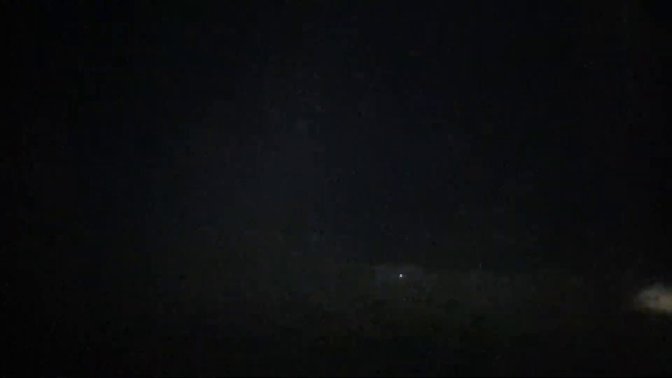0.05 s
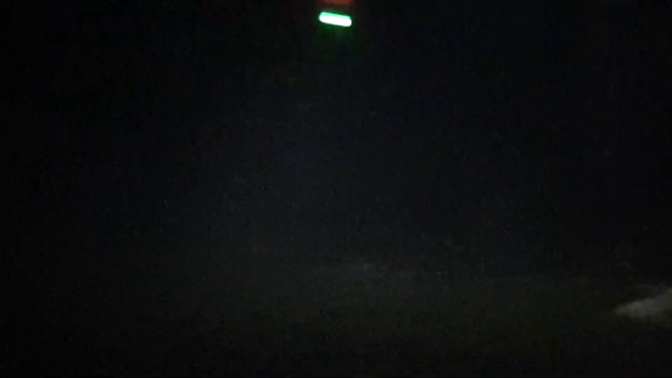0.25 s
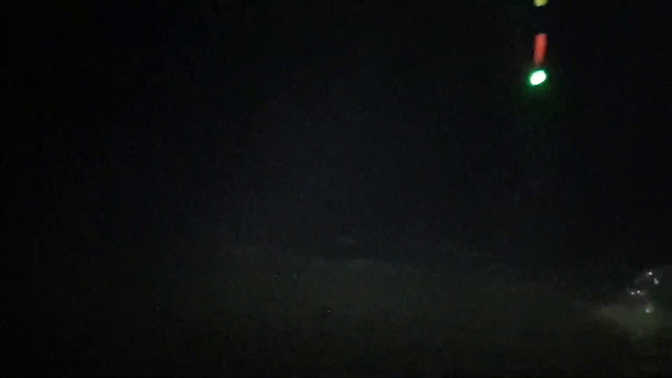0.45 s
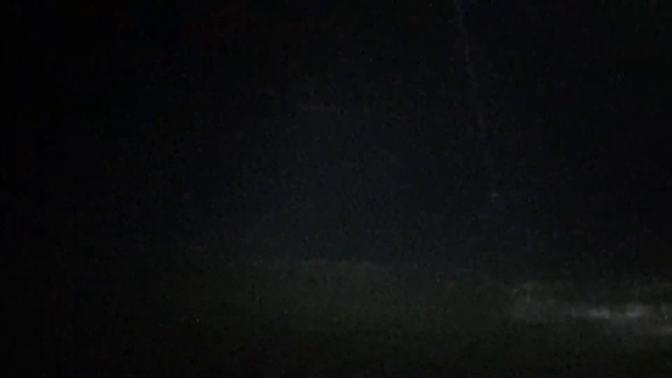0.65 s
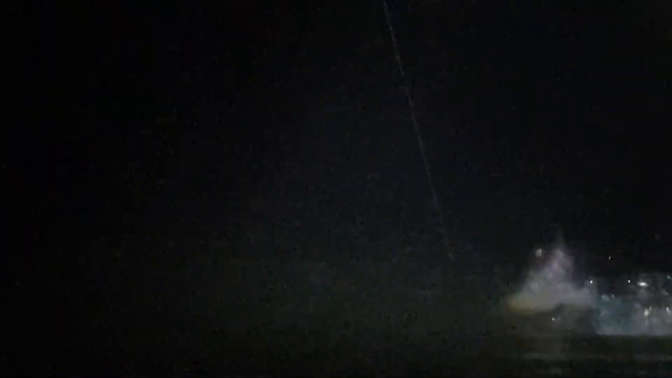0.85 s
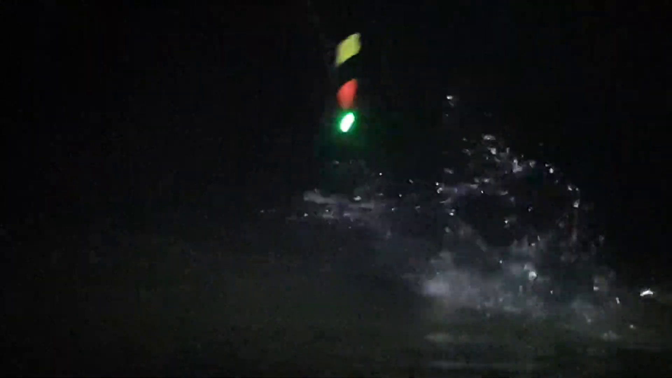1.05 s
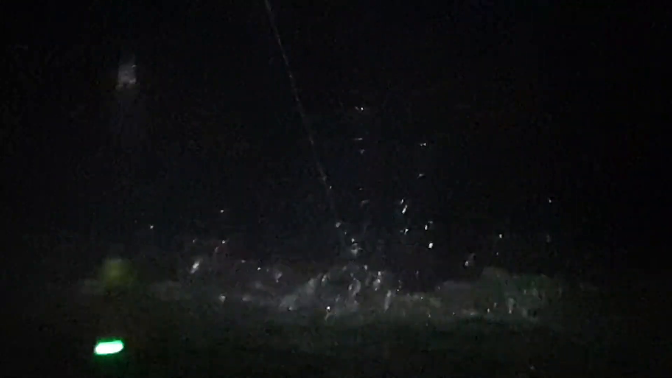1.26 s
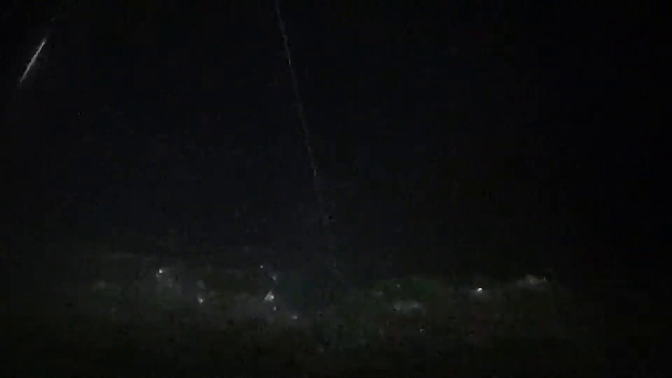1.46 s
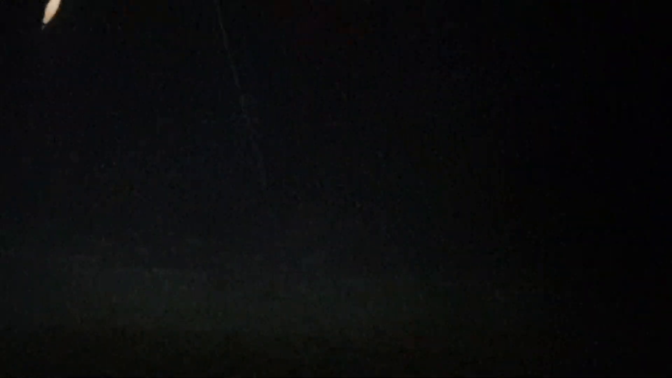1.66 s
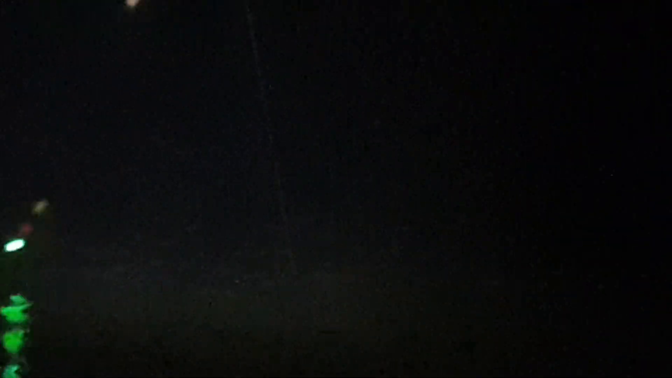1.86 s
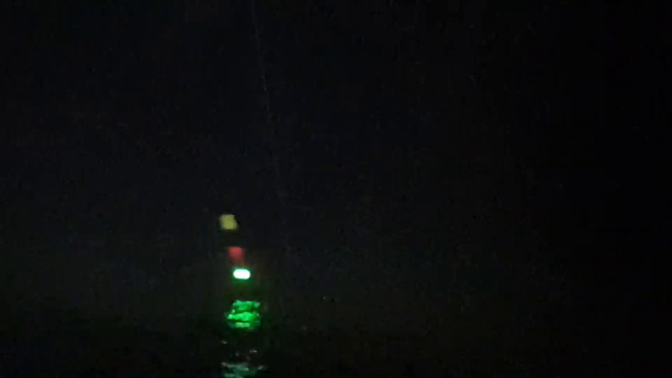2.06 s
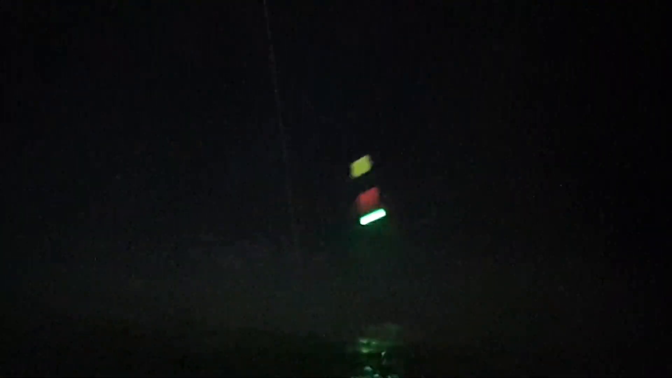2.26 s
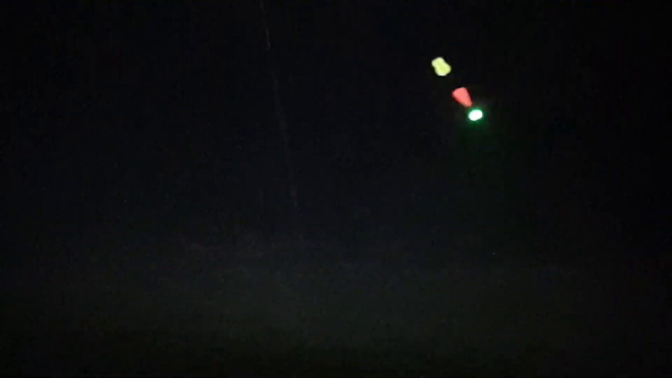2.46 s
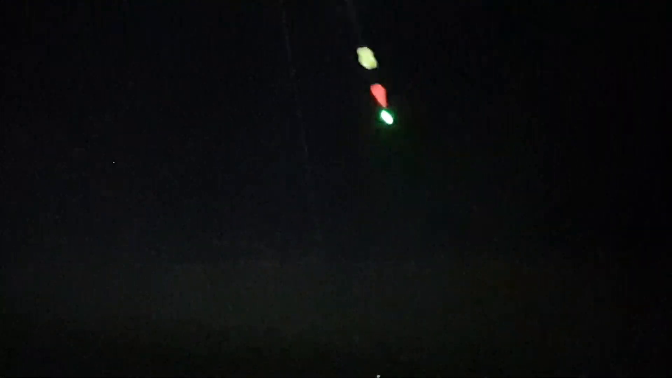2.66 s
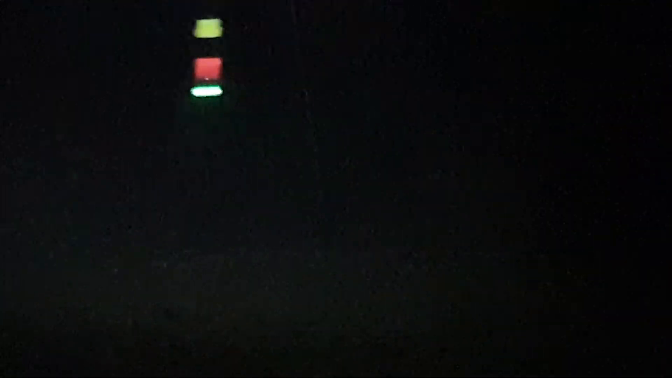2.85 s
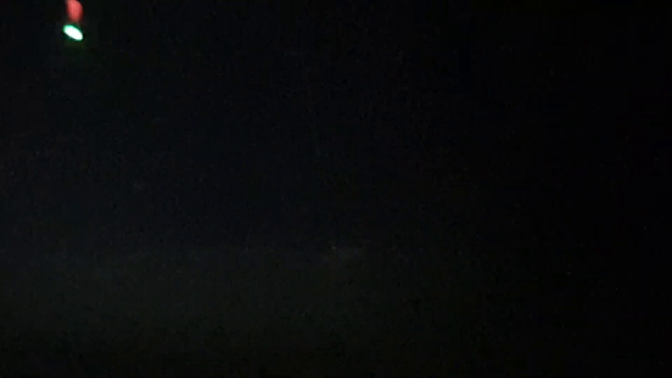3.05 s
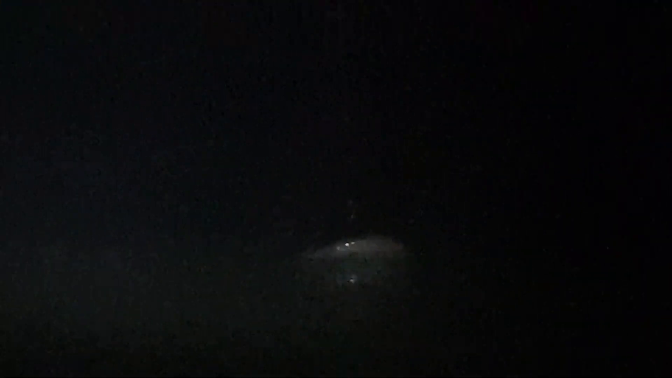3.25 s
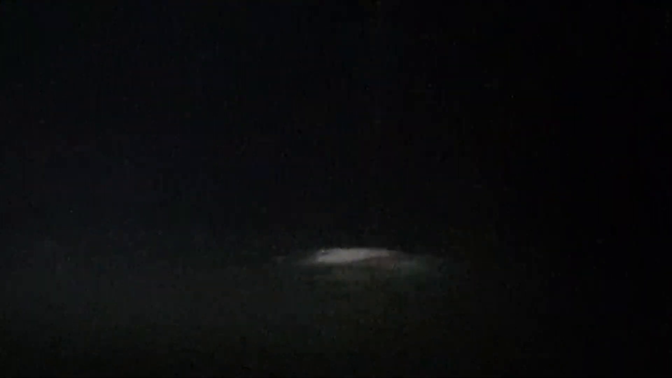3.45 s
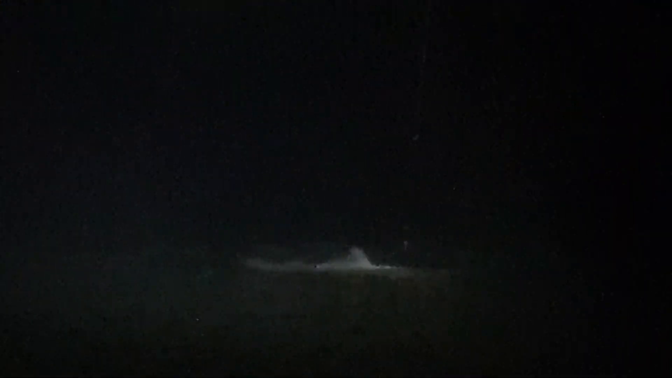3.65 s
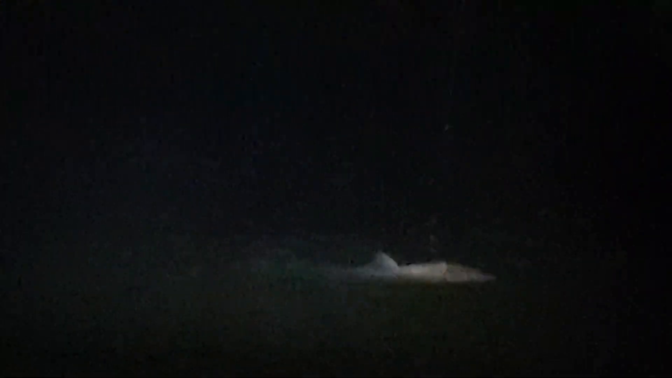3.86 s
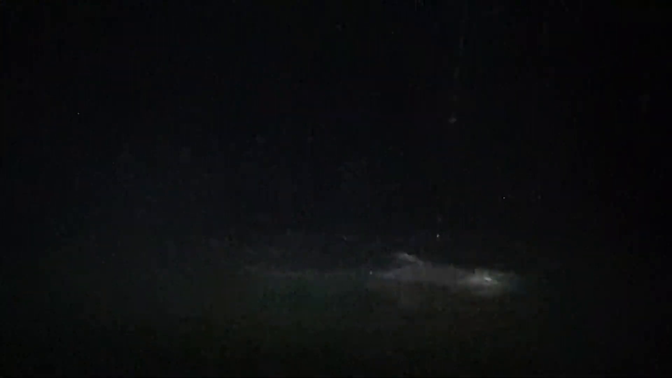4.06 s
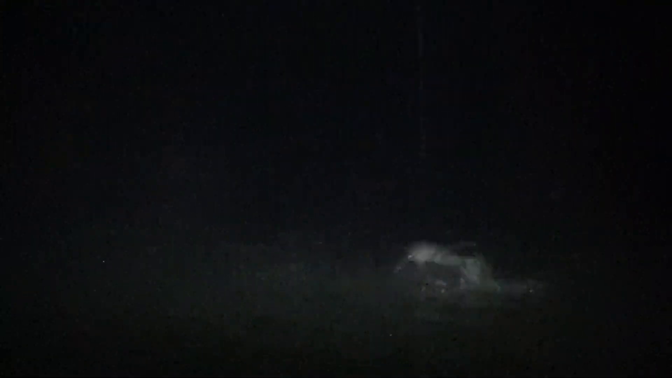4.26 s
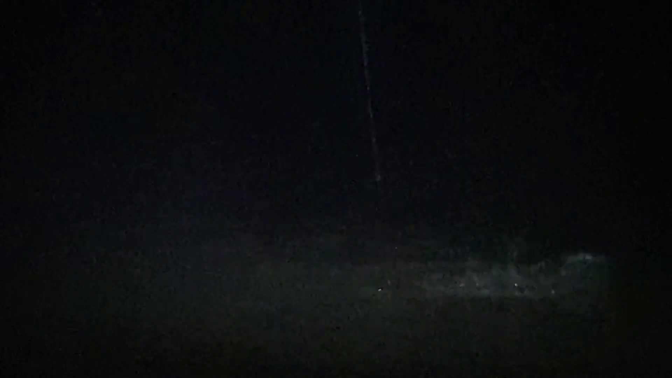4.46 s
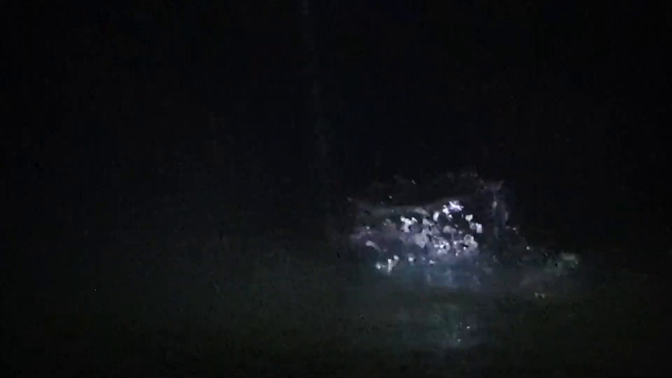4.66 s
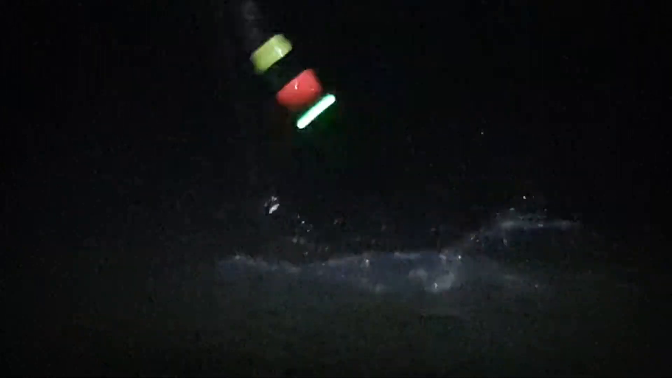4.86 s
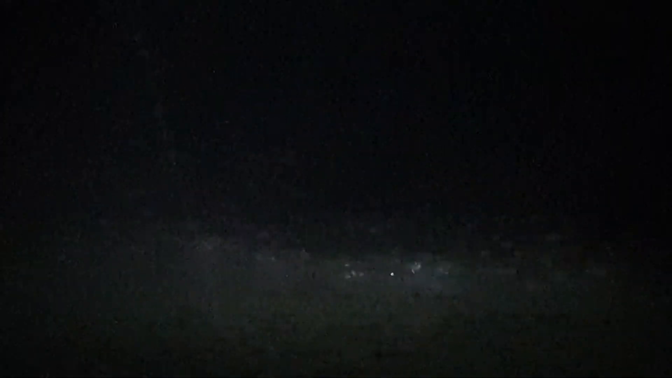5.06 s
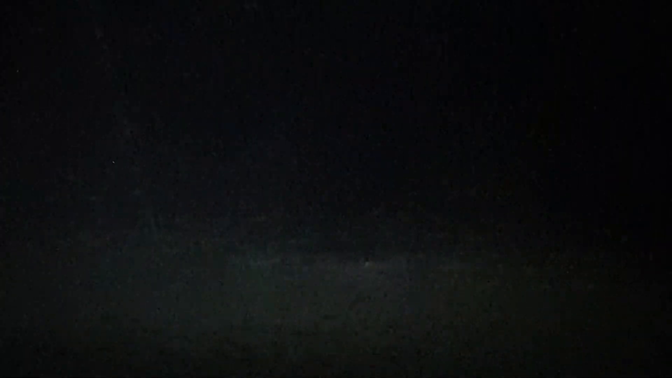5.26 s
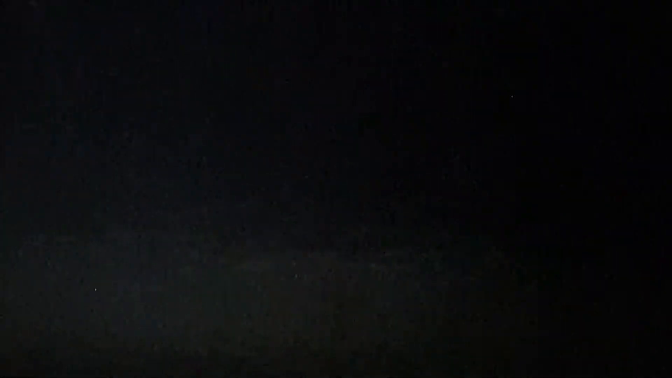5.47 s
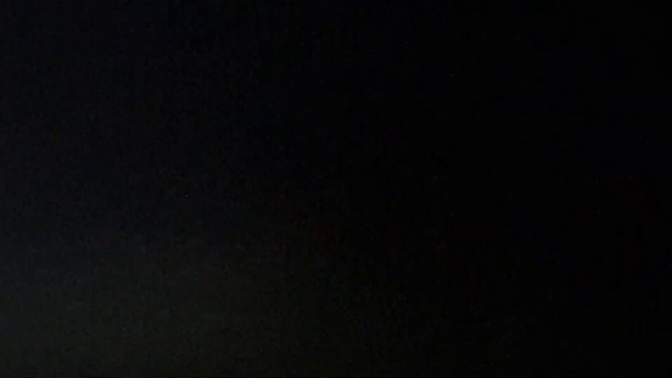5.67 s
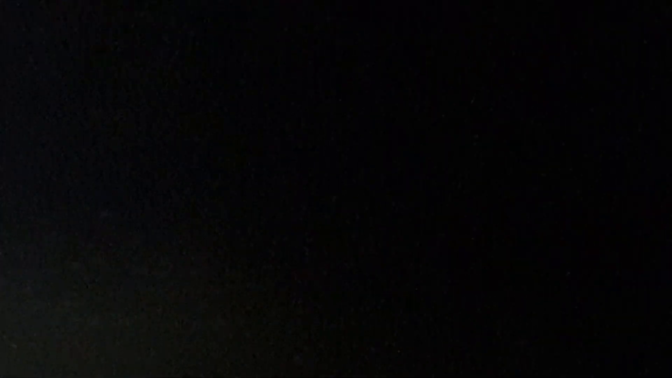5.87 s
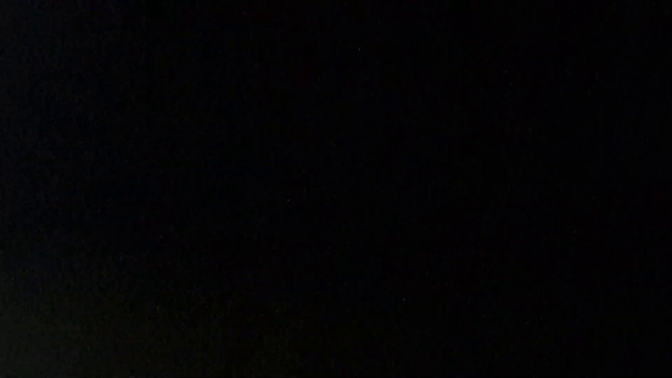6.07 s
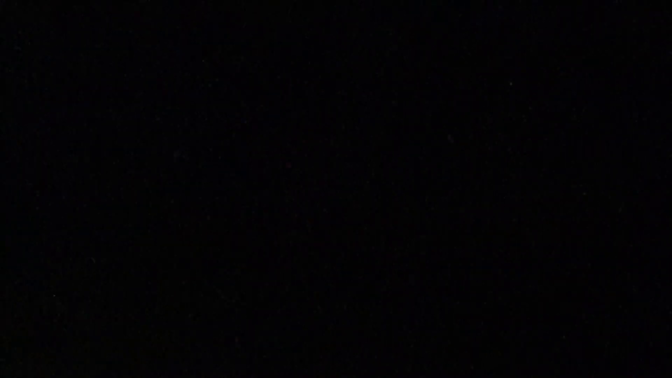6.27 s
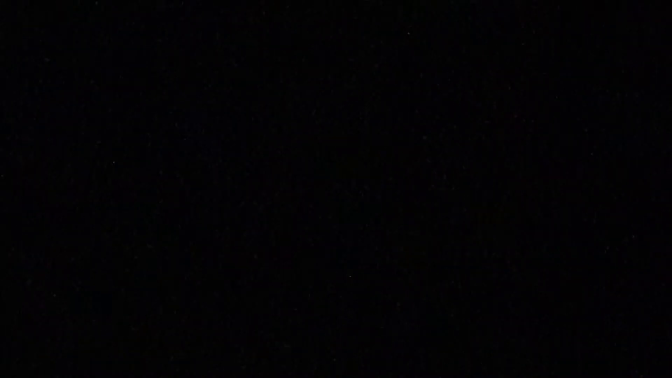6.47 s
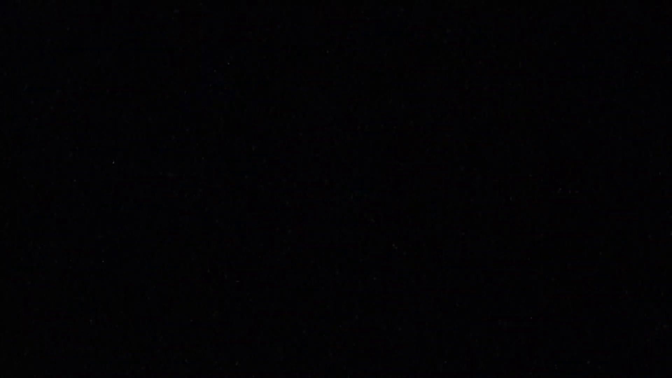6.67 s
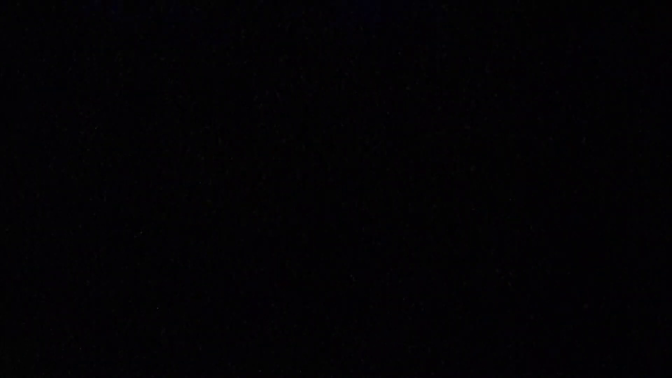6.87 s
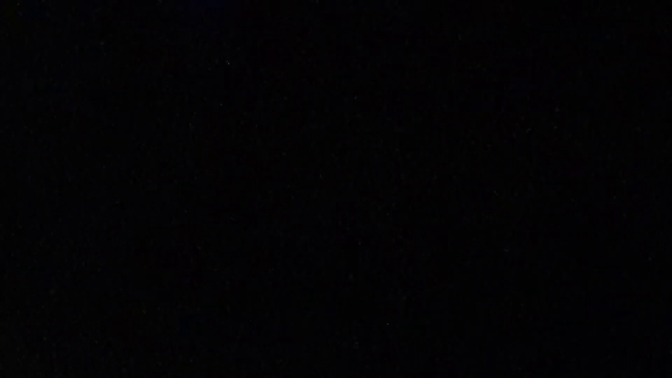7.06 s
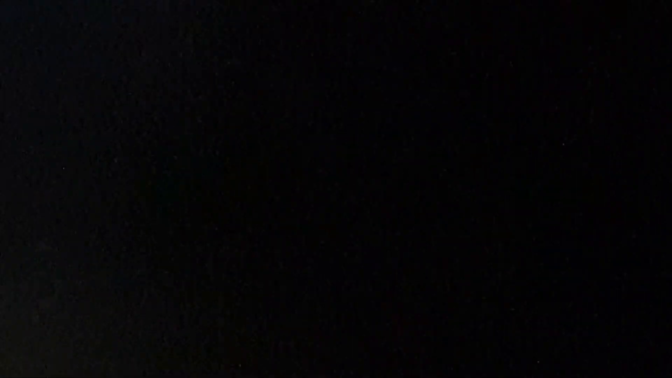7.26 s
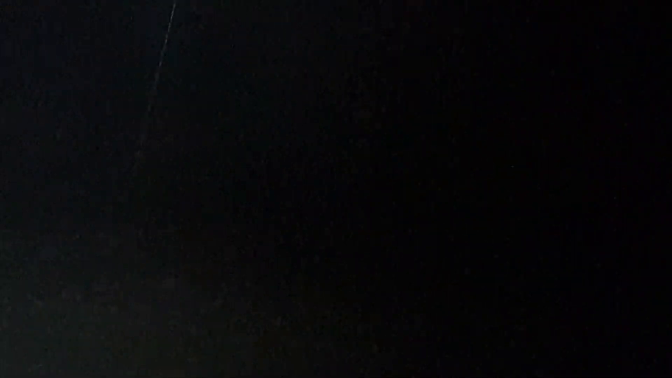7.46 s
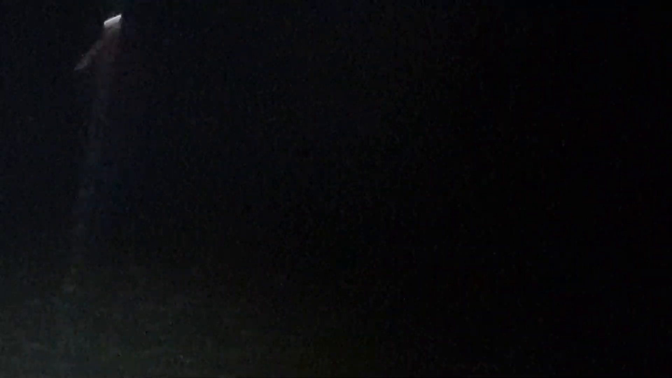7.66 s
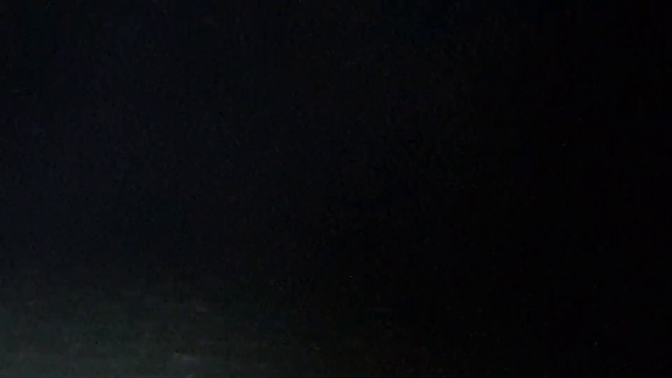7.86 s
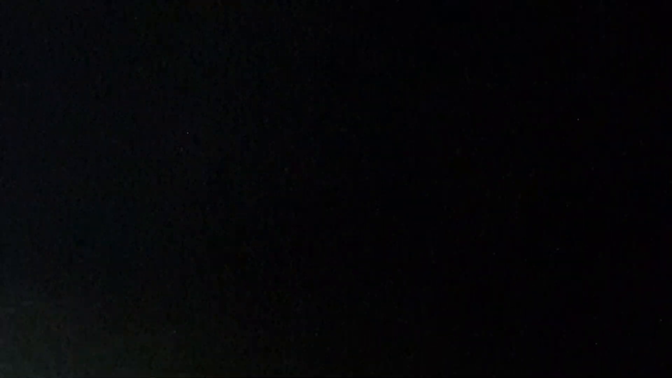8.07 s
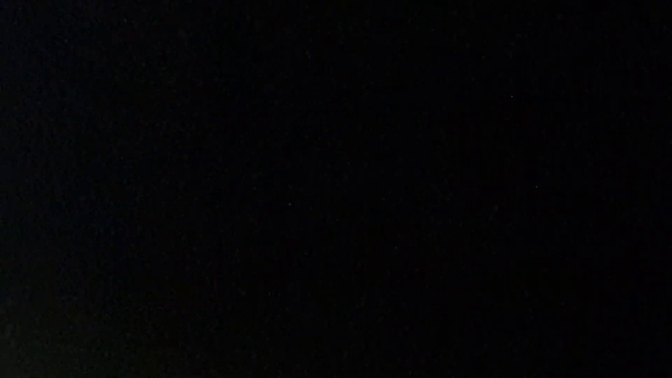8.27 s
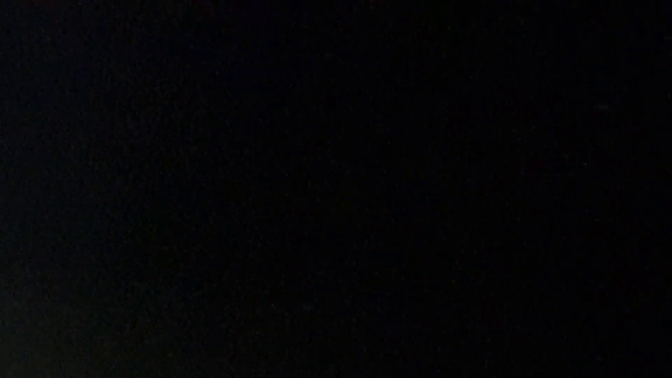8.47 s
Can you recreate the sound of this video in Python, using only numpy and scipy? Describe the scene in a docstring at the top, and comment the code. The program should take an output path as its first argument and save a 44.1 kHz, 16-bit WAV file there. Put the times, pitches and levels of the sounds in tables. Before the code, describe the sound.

A hooked fish thrashes at the surface of a still night pond in two splashing bouts, then clothing rustles and bumps close by.

```python
"""A far rumble, a wavering low hum (filtered noise and a sine) and a faint hiss lie under the whole night scene.
From the start a hooked fish thrashes at the surface of a pond in two bouts with a quiet spell between:
air pockets ring with gliding notes, churned water bubbles in damped sines, spray and drops patter in short bursts.
Then the angler shifts close to the microphone: jacket fabric swishes in bands of noise, with scuffs of noise
and soft bumps of damped low tones."""
import sys
import numpy as np
from scipy import signal
from scipy.io import wavfile

SR = 44100
rng = np.random.default_rng(int(sys.argv[2]) if len(sys.argv) > 2 else 0)


def persist_wave(psi):
    """Save psi, clipped to +-1, as 16-bit WAV."""
    counts = np.round(np.clip(psi, -1, 1) * 32767).astype(np.int16)
    wavfile.write(sys.argv[1], SR, np.atleast_2d(counts).T)


N = 375732
TIME = np.arange(N) / SR
STEPS = TIME[::32]  # coarse time for envelopes
CUTOFF_HZ = 15900

# relative spectrum of moving water as the microphone hears it: frequency_hz, density_db
WATER_COLOUR = [(150, 1), (300, -5), (500, 4.5), (1000, 4.5), (1600, 1.5), (3000, -4.5), (5000, -1),
                (7200, -1.5), (8800, -12), (10500, -6.5), (15500, -13.5)]


def from_db(db):
    """Level in decibels is twenty times the logarithm of an amplitude ratio; this inverts it."""
    return 10 ** (np.asarray(db) / 20)


def rms_one(x):
    """Root-mean-square normalisation gives signals equal mean power."""
    return x / np.sqrt(np.mean(x ** 2) + 1e-20)


def at_hz(points, hz):
    """Interpolation on a log-frequency axis treats every octave alike."""
    table = np.array(points)
    return np.interp(np.log(hz), np.log(table[:, 0]), table[:, 1])


def swell(s, hold_s, db, rise_db_per_s, fall_db_per_s):
    """Exponential growth and decay: the level climbs in dB to time s, holds, then falls."""
    before_s = np.maximum(s - STEPS, 0)
    after_s = np.maximum(STEPS - s - hold_s, 0)
    return from_db(db - rise_db_per_s * before_s - fall_db_per_s * after_s)


def joint_level(envelopes):
    """Incoherent sources add in power: joint level in dB at every sample."""
    power = np.sum(np.square(envelopes), axis=0)
    return np.interp(TIME, STEPS, 10 * np.log10(power + 1e-12))


def drift(rate, size=N):
    """Random modulation: Gaussian values of zero mean, `rate` a second, joined by straight lines."""
    return np.interp(np.arange(size) * rate / SR, np.arange(4000), rng.standard_normal(4000))


def band(x, low_hz, high_hz, order=2):
    """A Butterworth band-pass has a maximally flat passband."""
    edges = [low_hz, min(high_hz, .48 * SR)]
    return signal.sosfilt(signal.butter(order, edges, "band", fs=SR, output="sos"), x)


def add(out, s, sound, pan_db=0, lag=0):
    """Level and time differences place a sound: positive pan favours left, which hears it `lag` samples late."""
    for side, gain, delay in zip(out, from_db([pan_db / 2, -pan_db / 2]), (int(lag), 0)):
        start = min(max(int(s * SR) + delay, 0), N)
        side[start:start + len(sound)] += gain * sound[:N - start]


def banded_noise(colour, patchy_db, flicker_rate, count=20):
    """Partly correlated stereo noise: bands mix a common and an opposed part and flicker singly; rms 1."""
    # correlation of left and right: frequency_hz, likeness
    likeness = [(30, 0.296), (150, 0.87), (1000, 0.26), (4000, 0.072)]
    edges = np.geomspace(max(colour[0][0], 22), CUTOFF_HZ, count + 1)
    out = 0
    white = rng.standard_normal((2, 2, N))
    for k, (low, high) in enumerate(zip(edges, edges[1:])):
        mid, side = band(white[k % 2], low, high, order=3)
        hz = np.sqrt(low * high)
        alike = np.clip(at_hz(likeness, hz), -1, 1)
        flicker_db = patchy_db * drift(flicker_rate) if patchy_db else 0
        gain = from_db(at_hz(colour, hz) + flicker_db)
        out = out + gain * (np.sqrt(1 + alike) * mid + np.sqrt(1 - alike) * side * [[1], [-1]])
    return rms_one(out)


def crack(low_hz, high_hz, t60):
    """A broadband impact: band-limited noise decays exponentially, by 60 dB in t60 seconds."""
    noise = rms_one(band(rng.standard_normal(SR // 2), low_hz, high_hz, order=4))
    return noise * from_db(-60 * TIME[:SR // 2] / t60)


def night():
    """Amplitude modulation of filtered noise: a far rumble surges with a wavering hum, over a steady hiss."""
    # relative spectrum of the night air as the microphone hears it: frequency_hz, density_db
    night_colour = [(25, -23), (50, -2.5), (85, -3), (141, -16), (200, -16.5), (250, -25.5), (309, -20),
                    (430, -36), (3400, -44), (5000, -46), (6200, -43), (7300, -36.5), (8400, -58.5),
                    (11300, -41.5), (16000, -42.5)]
    air = from_db(-60.5) * banded_noise(night_colour, patchy_db=0, flicker_rate=1, count=28)
    rumble = signal.sosfiltfilt(signal.butter(2, 400, fs=SR, output="sos"), air)
    hum_hz, hum_waver_db, surge_db = 202, 4, 3
    hum_level = from_db(-67 + hum_waver_db * drift(6.2))
    hum = hum_level * np.sin(2 * np.pi * hum_hz * TIME + 1.41 * drift(21))
    surge = from_db(surge_db * drift(16)) - 1  # added to the rumble already in the air
    return air + surge * rumble + hum


def pocket(length_s, start_hz, end_hz, swelling):
    """Cavity resonance: a pocket's note glides, its ragged wall unsteadies it, an abrupt start slaps harder."""
    roughness, fade_db = .34, 13
    overtone_ratio, overtone_db = 4.4, -23
    turbulence_db = -10.5  # rush of water an octave above the note
    slap_db, slap_t60_s = -19.5, .059  # before the swelling factor below
    age = np.arange(min(int(2 * length_s * SR), SR // 2)) / (length_s * SR)  # in lengths
    swelling = np.clip(swelling, .02, .9)  # share of the length

    glide_hz = start_hz * (end_hz / start_hz) ** np.minimum(age, 1.1)
    phase = 2 * np.pi * np.cumsum(glide_hz) / SR
    rise = np.sin(np.pi / 2 * np.minimum(age / swelling, 1))
    fading = np.maximum(age - swelling, 0) / (1 - swelling)
    shape = rise * from_db(-fade_db * fading ** 1.58)

    wall, wobble, ripple = (drift(start_hz / 2, len(age)) for _ in range(3))
    note = (1 + roughness * wall) * np.sin(phase + roughness * wobble)
    overtone = from_db(overtone_db) * ripple * np.sin(overtone_ratio * phase + wobble)
    rush = from_db(turbulence_db) * drift(start_hz + end_hz, len(age)) * np.sin(2 * phase)
    slap = crack(start_hz, 2 * start_hz + 700, slap_t60_s)
    sound = from_db(slap_db) * (1 - swelling) ** 2 * slap
    sound[:len(age)] += shape * (note + overtone + rush)
    return sound


def pockets():
    """Resonance falls as a cavity grows: hollows ring lower opening, higher closing; deep plops ring longer."""
    # tail strokes open a hollow that closes again:
    # start_s, opening_s, closing_s, shallow_hz, deepest_hz, opening_db, closing_db
    strokes = [(.418, 0.053, 0.076, 417, 185.6, -32.5, -41), (.603, .082, 0.093, 594, 107, -29, -27.5),
               (1.273, 0.072, .13, 663, 348, -48, -45.5), (4.543, 0.079, 0.053, 416, 234.5, -37.5, -41.5)]
    # water closing over air: start_s, length_s, level_db, start_hz, end_hz, swelling (share of length)
    gulps = [(.05, 0.025, -66, 1003, 1050, 0.12), (.245, .04, -61, 530, 900, 0.17),
             (1.04, 0.091, -47.5, 440, 540, 0.083), (1.543, 0.039, -41.5, 770, 786, 0.047),
             (3.296, 0.07, -69, 777, 828, 0.14), (3.397, 0.032, -52, 935, 1910, 0.066),
             (4.01, .066, -55.5, 480, 1610, 0.59), (4.061, 0.051, -51.5, 684, 1180, 0.35),
             (4.229, 0.036, -37.5, 683, 1175, 0.079), (4.46, 0.033, -35.5, 922, 1033, .35),
             (4.49, 0.04, -39.5, 365, 428, 0.043), (4.933, .06, -39, 310, 626, 0.19)]
    # trapped air pockets, from a deep whump to small high plops: start_s, level_db, pitch_hz (at the start)
    plops = [(0.337, -36, 634), (.382, -25.5, 810), (.385, -29.5, 531), (0.67, -28, 91.8),
             (.754, -28.5, 784), (.768, -27.5, 288), (.889, -25.5, 740), (0.894, -28.5, 406),
             (1.017, -24.5, 416), (1.451, -37, 538), (3.738, -57, 1205), (3.785, -61.5, 1310),
             (4.132, -42, 1050), (4.193, -34, 910), (4.197, -34.5, 307), (4.543, -32.5, 772),
             (4.544, -28, 361), (4.547, -31, 1190), (4.682, -38, 582), (4.755, -37, 1250),
             (5.026, -36, 986), (5.392, -60, 1210)]
    opening_swell, closing_swell, plop_swell = .067, .55, .2  # shares of each length
    plop_cycles, plop_rise_octaves = 7.2, .28  # length in cycles of the starting pitch

    out, notes = np.zeros((2, N)), []
    for s, opening_s, closing_s, shallow_hz, deep_hz, opening_db, closing_db in strokes:
        opening = pocket(opening_s, shallow_hz, deep_hz, opening_swell)
        closing = pocket(closing_s, deep_hz, shallow_hz, closing_swell)
        notes += [(s, opening_db, opening), (s + opening_s, closing_db, closing)]
    for s, length_s, db, start_hz, end_hz, swelling in gulps:
        notes.append((s, db, pocket(length_s, start_hz, end_hz, swelling)))
    for s, db, hz in plops:
        notes.append((s, db, pocket(plop_cycles / hz, hz, hz * 2 ** plop_rise_octaves, plop_swell)))
    for s, db, sound in notes:
        add(out, s, from_db(db) * sound, pan_db=-2.2, lag=2)
    return out


def bubbles(level_db, low_hz, high_hz, per_s, cycles, spread_db, rise, count=40000):
    """Bubble resonance: each rings as a damped, rising sine; harder stirring makes more and louder ones."""
    crowding = .48  # dB on the bubble rate's gain per dB of stirring
    out, chance = np.zeros((2, N)), rng.random((count, 7))
    stir_db = level_db[(chance[:, 0] * N).astype(int)]
    rate = per_s * from_db(crowding * (stir_db + 42.5))  # per_s holds at -42.5 dB
    hz = low_hz * (high_hz / low_hz) ** chance[:, 1]
    weight_db = at_hz(WATER_COLOUR, hz) + spread_db * chance[:, 2] ** 2
    weight = rms_one(from_db(weight_db) * np.sqrt(hz))
    decay = cycles * 2 ** (2 * chance[:, 3] - 1) / hz / np.log(1000)  # time constant, s
    height = 2 * from_db(stir_db) * weight / np.sqrt(rate * decay)
    # bubbles lie scattered over the splash; the higher their pitch, the wider their level differences
    pan_db = 11 * np.sqrt(hz / 3000) * (chance[:, 5] - .5)
    lag = np.round(8 * chance[:, 6] - 2)
    for k in np.flatnonzero(chance[:, 4] < rate * TIME[-1] / count):
        age = np.arange(int(6 * decay[k] * SR)) / (decay[k] * SR)  # in time constants
        ring = np.sin(2 * np.pi * hz[k] * decay[k] * age * (1 + rise * age))
        ping = ring * np.exp(-age) * (1 - np.exp(-6 * age))
        add(out, chance[k, 0] * TIME[-1], height[k] * ping, pan_db[k], lag[k])
    return out


def gushes(share_db):
    """Transient growth and exponential decay: envelopes of water sheets thrown up by a flick of the tail."""
    # start_s, level_db (before share and swell), t60_s
    sheets = [(.383, -32, 0.05), (.51, -55.5, 0.51), (.888, -36, 0.016), (4.172, -53, 0.22),
              (4.22, -36, 0.05), (4.476, -44.5, 0.075), (4.612, -42.5, .15), (4.637, -43, 0.14),
              (4.748, -51, .11), (4.84, -58.5, .1), (4.885, -39, 0.036), (4.956, -40.5, 0.046),
              (5.022, -49, 0.082)]
    swell_s = .026
    envelopes = []
    for s, db, t60 in sheets:
        decay = from_db(db + share_db - 60 * np.maximum(STEPS - s, 0) / t60)
        envelopes.append(decay * np.clip((STEPS - s) / swell_s, 0, 1))
    return envelopes


def clumps(per_s, t60):
    """Shot noise: water lands in random handfuls, each lifting a level in dB that sinks again."""
    landings = (rng.random(N) < per_s / SR) * rng.exponential(1, N)
    power = signal.lfilter([1], [1, -from_db(-120 / (t60 * SR))], landings + 1e-18)
    return 10 * np.log10(.45 + .55 * power / power.mean())


def churn():
    """Incoherent superposition: fast-building, slow-settling bubbles and spray stand out of a wash of froth."""
    # spells of stirred water: full_strength_s, hold_s, bubbling_db, spray_db (both before the mix)
    spells = [(0.086, 0.14, -78.5, -76), (0.382, 0.29, -51.5, -50.5), (0.69, .33, -45.5, -50.5),
              (1.151, .24, -48.5, -46), (1.627, .11, -75, -62.5), (2.043, 0.3, -90, -78.5),
              (3.362, 0.22, -70.5, -68), (4.148, 0.056, -59.5, -68.5), (4.329, 0.027, -58.5, -56),
              (4.496, 0.52, -53.5, -54)]
    rise_db_per_s, bubbling_fall_db_per_s, spray_fall_db_per_s = 186, 88, 81.5
    stirred = [swell(s, hold, db, rise_db_per_s, bubbling_fall_db_per_s) for s, hold, db, _ in spells]
    sprayed = [swell(s, hold, db, rise_db_per_s, spray_fall_db_per_s) for s, hold, _, db in spells]
    landing_db = clumps(per_s=65, t60=.09)
    bubbling_db = joint_level(stirred + gushes(share_db=9.5)) + landing_db
    spray_db = joint_level(sprayed + gushes(share_db=4)) + landing_db

    gurgle = from_db(4.5) * bubbles(bubbling_db, 421.4, 3400, per_s=950, cycles=36, spread_db=1.5, rise=.012)
    spray = from_db(-3.5) * bubbles(spray_db, 2956, 14900, per_s=2000, cycles=36, spread_db=5.5, rise=.008)
    froth = banded_noise(WATER_COLOUR, patchy_db=-0.5, flicker_rate=83) * from_db(-5.5)
    low_wash = from_db(bubbling_db + 1.0) * rms_one(band(froth, 140, 4600))
    high_wash = from_db(spray_db - 2.5) * rms_one(band(froth, 3170, 16000))
    return (gurgle + spray + low_wash + high_wash) * from_db([[-1.2], [1.2]])


def bank(x, t60=0.11):
    """Diffuse scattering: the bank returns a dull echo, as convolution with decaying noise of unit energy."""
    scatter = [rms_one(crack(437, 2800, t60)) / np.sqrt(SR / 2) for _ in x]
    return np.array([signal.fftconvolve(side, tail)[:N] for side, tail in zip(x, scatter)])


def drops():
    """Impact and bubble resonance: slaps and heavy drops tick and crack, and trap one tiny ringing bubble."""
    # start_s, level_db, pitch_hz
    strikes = [(0.288, -42.5, 3370), (.39, -27, 7080), (0.486, -35.5, 1400), (.7178, -31, 866),
               (.7555, -37, 1000), (.922, -32.5, 6400), (1.155, -36, 3200), (1.2055, -35.5, 10100),
               (1.299, -34.5, 4860), (1.4023, -38.5, 2460), (1.452, -34.5, 1180), (3.536, -53, 2850),
               (4.2199, -38.5, 7280), (4.228, -39.5, 3320), (4.488, -36.5, 6360), (4.897, -29.5, 2950),
               (4.9616, -35, 6370)]
    ping_t60, tick_t60, crack_t60 = .011, .002, .018  # s
    out, t = np.zeros((2, N)), TIME[:SR // 2]
    for s, db, hz in strikes:
        ping = np.sin(2 * np.pi * hz * t) * from_db(-60 * t / ping_t60)
        tick = .5 * crack(2000, 14000, tick_t60)
        burst = from_db(-7) * crack(hz / 2, 2 * hz, crack_t60)
        add(out, s, from_db(db) * (ping + tick + burst), pan_db=-5.0, lag=1)
    return out


def cloth():
    """Friction noise: fabric sliding on fabric gives a fine hiss and a coarse rasp, each with its own level."""
    # full_strength_s, hold_s, fall_db_per_s, hiss_db, rasp_db (both before flicker and balance)
    slides = [(6.455, 0.15, 31.5, -56.5, -63), (7.142, 0.035, 58.5, -69.5, -72.5),
              (7.565, 0.086, 148, -52, -53.5), (7.727, 0.031, 393, -47.5, -41.5),
              (7.815, 0.17, 116, -63.5, -65), (8.14, .17, 53, -69, -79.5)]
    # relative spectra of hiss and rasp as the microphone hears them: frequency_hz, density_db
    hiss_colour = [(1500, -35), (3000, -17), (5000, 0), (7000, 3), (8800, -13), (10800, -5), (15500, -5)]
    rasp_colour = [(250, -7), (600, -5.5), (1100, -6.5), (1800, -17), (2600, -2.5), (4500, -3.5),
                   (9000, -21.5)]
    rise_db_per_s = 139
    hiss_db = joint_level([swell(s, hold, db, rise_db_per_s, fall) for s, hold, fall, db, _ in slides])
    rasp_db = joint_level([swell(s, hold, db, rise_db_per_s, fall) for s, hold, fall, _, db in slides])
    hiss = from_db(hiss_db) * banded_noise(hiss_colour, patchy_db=1.8, flicker_rate=63, count=12)
    rasp = from_db(rasp_db) * banded_noise(rasp_colour, patchy_db=3.5, flicker_rate=71, count=14)
    return (hiss + rasp) * from_db(0.68 * drift(250)) * from_db([[-1.6], [1.6]])


def bumps():
    """Damped oscillation: soft bumps of the angler's movement are low tones of unsteady phase with dull noise."""
    # start_s, level_db, pitch_hz, t60_s
    thuds = [(6.423, -36.5, 282, 0.14), (6.554, -23.5, 198, 0.051), (6.583, -37.5, 133, 0.21),
             (6.608, -55, 193.4, 1), (7.75, -31.5, 98.5, 0.17), (7.77, -46.5, 42, 0.64),
             (8.13, -48, 102, 0.11)]
    out, t = np.zeros((2, N)), TIME[:SR // 2]
    for s, db, hz, t60 in thuds:
        tone = np.sin(2 * np.pi * hz * t + 1.93 * drift(94.5, len(t)))
        thud = tone * (1 - np.exp(-t / 0.0012)) * from_db(-60 * t / t60)
        add(out, s, from_db(db) * (thud + .5 * crack(39, 222, t60)), pan_db=-5.0, lag=12)
    return out


def scuffs():
    """Impulsive friction: snaps and scuffs of clothing and tackle are decaying bursts of band-limited noise."""
    # start_s, level_db, low_hz, high_hz, t60_s
    snaps = [(6.424, -33.5, 884, 2400, 0.017), (6.432, -37.5, 875, 2320, 0.032),
             (7.547, -37, 1710, 2840, 0.1), (7.5525, -28, 2520, 14400, 0.026),
             (7.646, -38.5, 583, 8500, 0.081), (7.995, -46, 2460, 11800, 0.0097),
             (8.23, -44, 3600, 8240, 0.0052)]
    out = np.zeros((2, N))
    for s, db, low_hz, high_hz, t60 in snaps:
        add(out, s, from_db(db) * crack(low_hz, high_hz, t60), pan_db=-3.0, lag=10)
    return out


def housing(x):
    """Resonance: the hand-held housing reinforces sound near its own frequencies."""
    # frequency_hz, width_hz, level_db (of the added band)
    resonances = [(1700, 250, 9.5), (2400, 124, -0.5), (10400, 1900, 2.5)]
    return x + sum(from_db(db) * band(x, hz - width / 2, hz + width / 2, order=1)
                   for hz, width, db in resonances)


def angler():
    """Superposition: cloth and scuffs pass through the resonant housing, and bumps join them."""
    return housing(cloth() + scuffs()) + bumps()


def scene():
    """Superposition: the fish and its echo, the angler close by, and the night around them."""
    fish = pockets() + churn() + drops()
    echo_db = -17
    return fish + from_db(echo_db) * bank(fish) + angler() + night()


def record(dry):
    """Linear filtering: the right microphone port lifts the treble; an elliptic low-pass cuts the top steeply."""
    heard = dry + [[0], [.4]] * band(dry, 3660, 9640, order=1)
    return signal.sosfilt(signal.ellip(12, .1, 80, CUTOFF_HZ, fs=SR, output="sos"), heard)


dry = scene()
out = record(dry)
persist_wave(out)
```